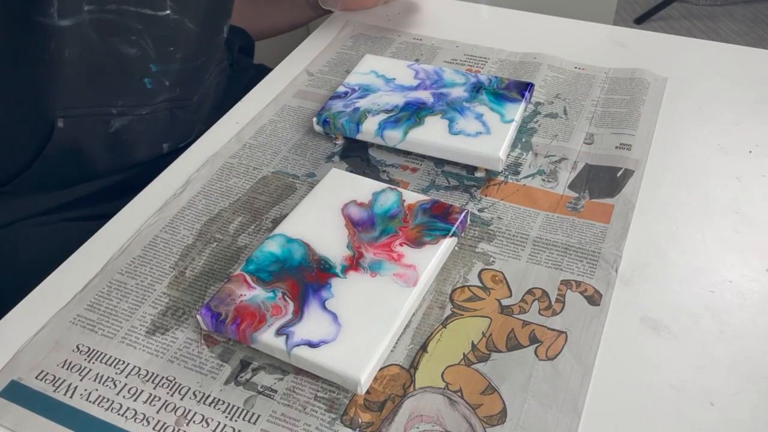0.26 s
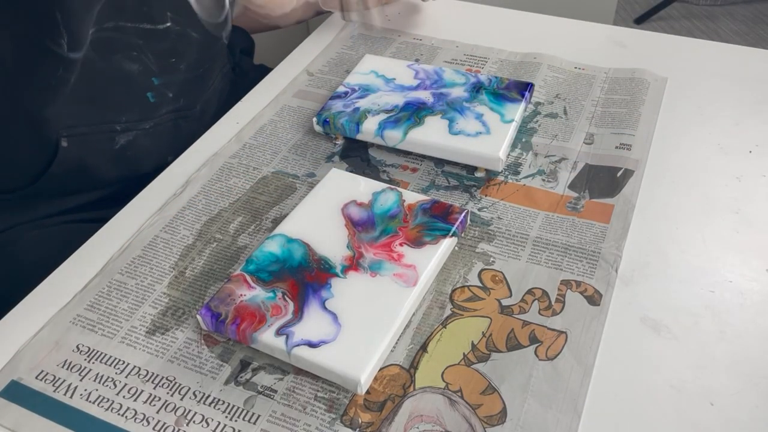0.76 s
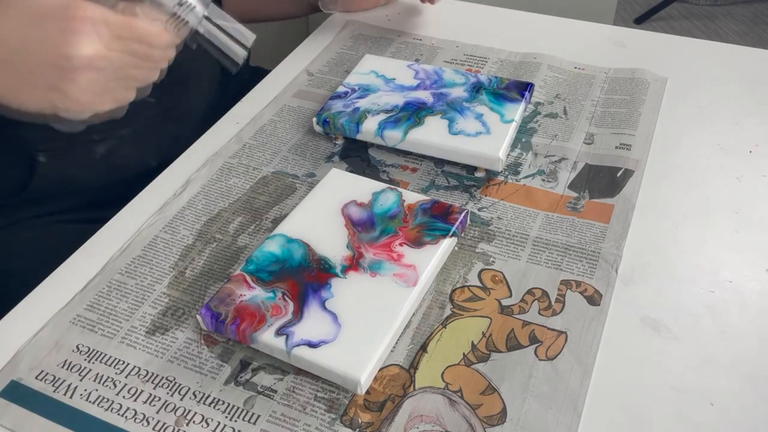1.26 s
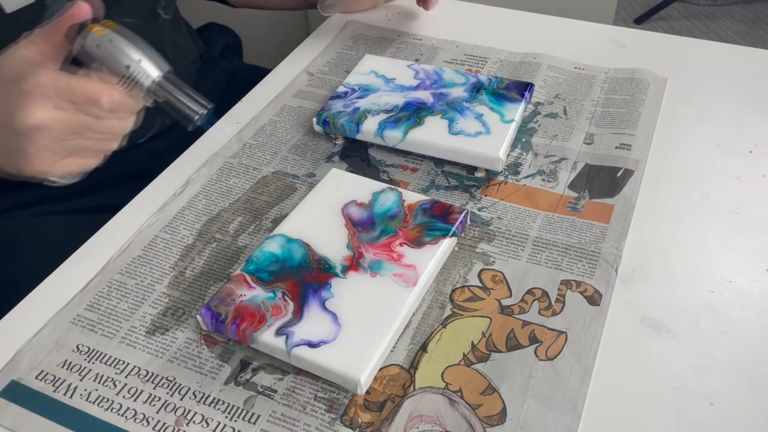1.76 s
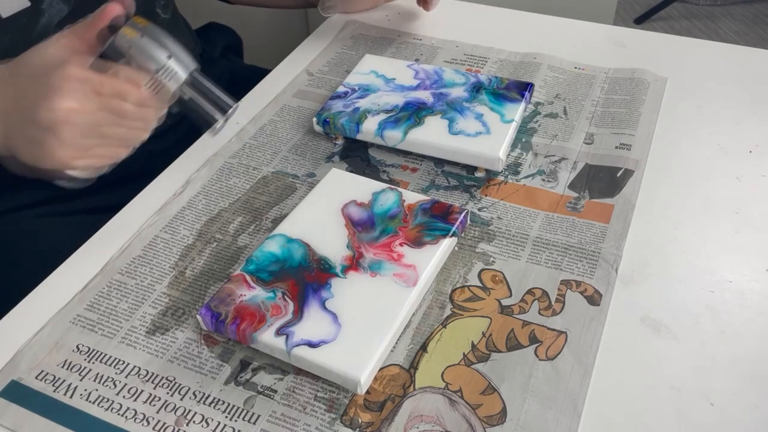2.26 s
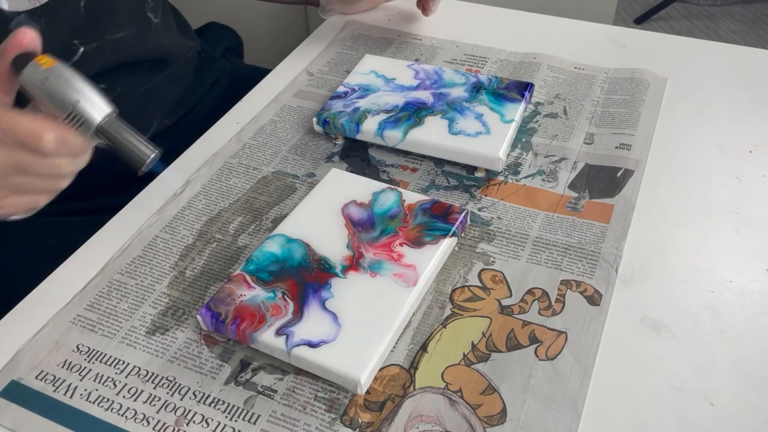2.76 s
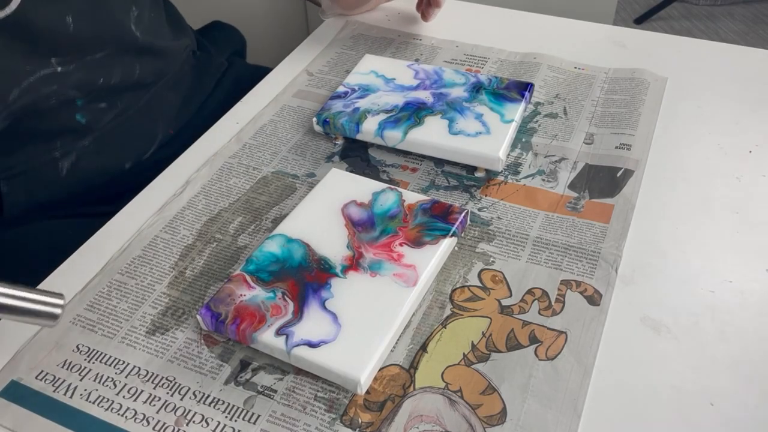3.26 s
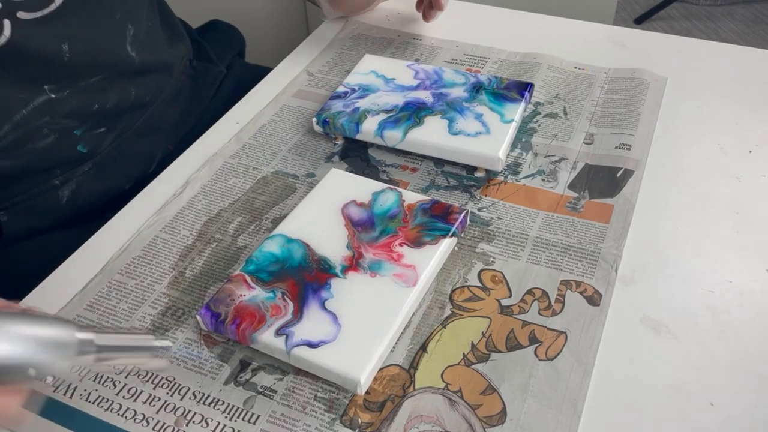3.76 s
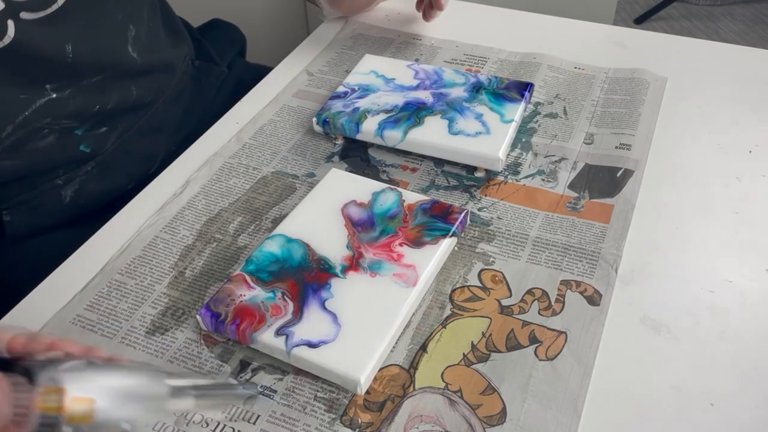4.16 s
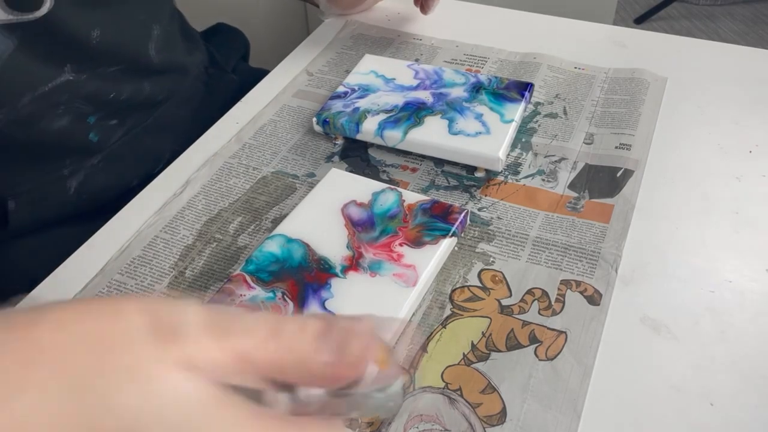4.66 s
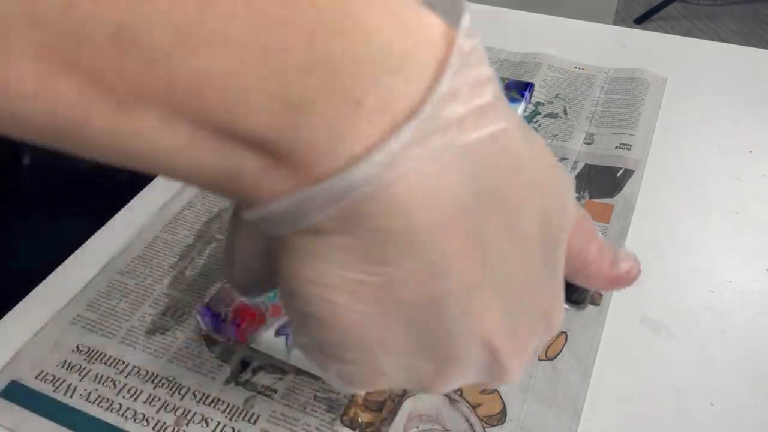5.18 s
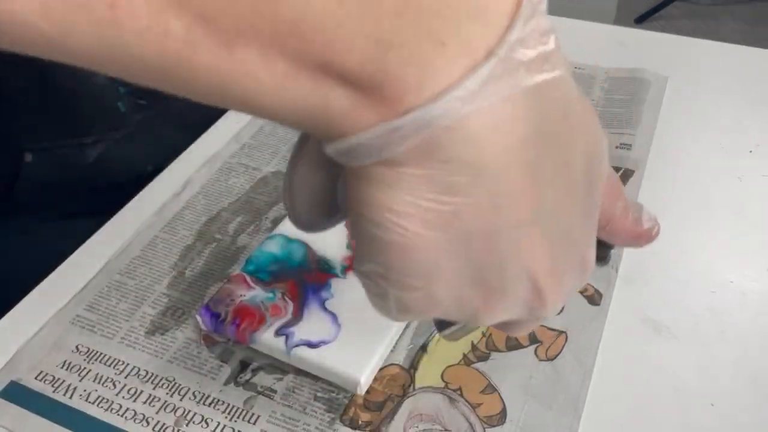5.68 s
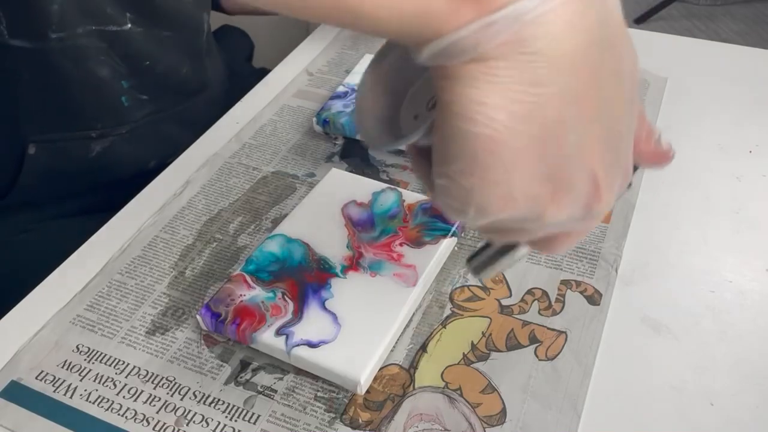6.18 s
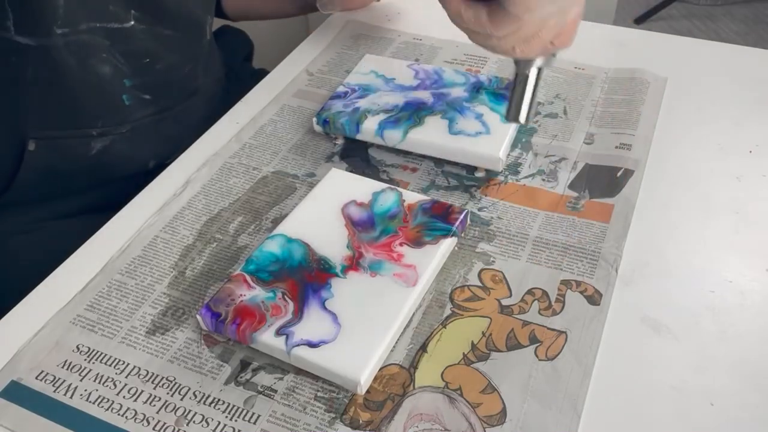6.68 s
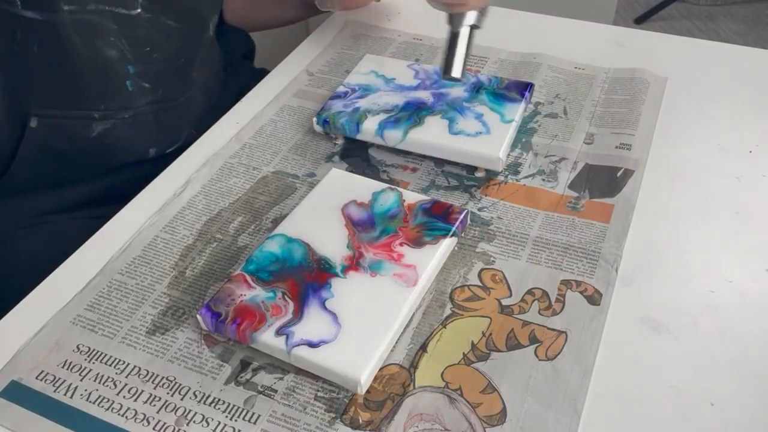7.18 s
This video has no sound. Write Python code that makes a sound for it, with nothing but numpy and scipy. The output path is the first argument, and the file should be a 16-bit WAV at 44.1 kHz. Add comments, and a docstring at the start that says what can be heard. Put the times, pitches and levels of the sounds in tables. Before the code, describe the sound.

Steady blowtorch hiss in a room, repeatedly released and relit: light clicks, brief cold gas hiss, loud crisp spark snap, low whoomp, renewed roar.

```python
"""Butane torch over wet paintings

A small torch, already alight, is swept over wet paintings on a workroom table and relit four times.
Each relight: safety catch clicks, cold gas hisses, the piezo hammer snaps, the mixture thumps alight.
Shaped noise makes the flame's roar and hiss, resonated noise bursts the contacts; the room echoes and hums."""
import sys
import numpy as np
from scipy import signal
from scipy.fft import rfft, irfft, next_fast_len
from scipy.io import wavfile
from scipy.ndimage import uniform_filter1d, map_coordinates

SR = 44100
rng = np.random.default_rng(int(sys.argv[2]) if len(sys.argv) > 2 else 0)


def unload_audio(sound):
    """Save the sound as a 16-bit wav file, at the path given as the first command line argument."""
    columns = np.transpose(np.atleast_2d(sound))
    # keep every value between -1 and 1, then stretch to whole-number steps
    steps = np.round(np.clip(columns, -1, 1) * 32767)
    wavfile.write(sys.argv[1], SR, steps.astype(np.int16))


N = 327663

# One row per squeeze of the trigger, the first already alight; the hold colours each flame. Relative levels:
# (gas opens [s], cold gas [dB], roar [dB], jet hiss [dB], favoured pitch [Hz], its boost [dB],
#  body [dB], presence [dB], treble [dB])
BURNS = [(-.4, -55, -46, -56, 1290, 6, -2, 1, -.5), (1.43, -56.5, -45, -54.5, 632, 4, -2, -1, 0),
         (3.268, -55, -44, -55.5, 738, 1.5, -1.5, .5, 0),
         (4.854, -57, -43.5, -53.5, 1590, 4.5, 2.5, -0.9, -4),
         (6.853, -55.5, -45.8, -55.5, 1095, 7, 6, 3, -1.5)]
# Piezo snaps, each with its ignition thump:
# (time [s], snap level [dB], thump level [dB], snap rise [s], lower ring [Hz], upper ring [Hz])
SNAPS = [(1.5291, -15.5, -27, 0.0013, 2830, 8560), (3.3257, -14.5, -27, 0.00042, 7600, 14400),
         (5.0003, -14.5, -26.5, 0.00058, 1550, 11200), (6.9117, -14.5, -25, 0.00078, 6000, 12800)]
# Letting go: the valve ticks shut, then the trigger meets its stop:
# (time [s], valve level [dB], stop level [dB], trigger travel [s], stop's ring [Hz])
RELEASES = [(0.908, -44.5, -43, 0.018, 2660), (2.848, -46, -48, .025, 2720), (4.381, -43, -54, 0.024, 1997),
            (6.537, -43.5, -42, .025, 1780)]
# Low resonances of table and room: (frequency [Hz], width [Hz], relative level [dB])
ROOM_MODES = [(139, 19, 6), (217.5, 38, 4.5), (323, 8.6, 0.5), (510, 20, -3.5), (620, 47, -7)]
DRIFT_PER_S = 4.5  # random knots a second in the unsteady hand


def amp(db):
    """Decibels to gain."""
    return 10 ** (np.asarray(db) / 20)


def unit(x):
    """Scale to rms 1."""
    return x / np.sqrt(np.mean(x ** 2) + 1e-20)


def along(points, hz):
    """Read (Hz, value) points on a log frequency axis."""
    f, v = np.transpose(points)
    return np.interp(np.log(hz + 1), np.log(f + 1), v)


def wobble(rate):
    """A smooth random curve through rate knots a second."""
    knots = rng.standard_normal(int(N * rate / SR) + 4)
    return map_coordinates(knots, [np.arange(N) * rate / SR])


def gate(start, stop, rise, fall):
    """An envelope that swells from start and dies away from stop, both exponentially."""
    t = np.arange(N) / SR
    swell = 1 - np.exp(-np.maximum(t - start, 0) / rise)
    return swell * np.exp(-np.maximum(t - stop, 0) / fall)


def filtered(x, response):
    """Filter x by a response given as a function of frequency."""
    m = next_fast_len(len(x) + SR // 8)
    return irfft(rfft(x, m) * response(np.fft.rfftfreq(m, 1 / SR)), m)[:len(x)]


def resonate(x, modes):
    """x plus the ringing of its (Hz, width Hz, dB) band-pass resonances."""
    def response(f):
        ringing = sum(amp(db) * 1j * f * width / (hz * hz - f * f + 1j * f * width)
                      for hz, width, db in modes)
        return 1 + ringing
    return filtered(x, response)


def noise(spectrum, size=N):
    """Random noise coloured by a spectrum and scaled to rms 1."""
    return unit(filtered(rng.standard_normal(size), lambda hz: amp(along(spectrum, hz))))


def smooth_patches(shape, bins, frames):
    """Random time-frequency patches of rms 1, smoothed over bins and frames."""
    grain = uniform_filter1d(rng.standard_normal(shape), size=bins, axis=0)
    return unit(uniform_filter1d(grain, size=frames, axis=1))


def add(track, s, sound):
    """Mix a sound in at time s."""
    part = track[round(s * SR):][:len(sound)]
    part += sound[:len(part)]


def burn_times():
    """(gas opens, flame lights, valve closes) per burn: snaps light it, releases end it; the last burns on."""
    opens = [s for s, *_ in BURNS]
    lit = opens[:1] + [s for s, *_ in SNAPS]
    shut = [s for s, *_ in RELEASES] + [N / SR + .5]
    return zip(opens, lit, shut)


def workroom(rush_db=-65.5):
    """The room's faint rush is shaped noise; its hum is one sine of wavering phase."""
    # Rush spectrum: (frequency [Hz], relative density [dB])
    rush_spectrum = [(20, -9.5), (45, -1.5), (65, -7), (100, -5.5), (200, -6), (600, -19), (1200, -17),
                     (2200, -18), (3600, -22), (6400, -26), (16000, -34)]
    # Hum: (frequency [Hz], level [dB])
    hum_hz, hum_db = (210, -78.5)
    hum = np.sin(2 * np.pi * hum_hz * np.arange(N) / SR + .6 * wobble(3.3))
    return amp(rush_db) * noise(rush_spectrum) + amp(hum_db) * unit(hum)


def room_tail(build=0.0018):
    """The room's impulse response, of unit energy: noise whose every frequency dies at its own speed."""
    # Decay of the room: (frequency [Hz], t60 [s])
    decay_times = [(120, 0.27), (500, 0.42), (2000, 0.49), (7000, 0.41), (11000, 0.37), (15000, 0.44)]
    hz, t, z = signal.stft(rng.standard_normal(SR // 2), SR, nperseg=256)
    decay = amp(-60 * t / along(decay_times, hz)[:, None])
    tail = signal.istft(z * decay, SR, nperseg=256)[1][:SR // 2]
    # the echoes take a moment (build, s) to gather
    tail = tail * (1 - np.exp(-(np.arange(len(tail)) / SR / build) ** 2))
    return tail / np.linalg.norm(tail)


def reverb(x):
    """x as the room returns it, through one fresh set of echoes."""
    return signal.fftconvolve(x, room_tail())[:len(x)]


def moving_reverb(x, count=16):
    """The torch moves, so each stretch of its sound meets a different set of echoes."""
    wet = np.zeros(N)
    for part in np.array_split(np.arange(N), count):
        stretch = np.pad(x[part], (0, SR // 2))  # leaves room for the tail
        add(wet, part[0] / SR, reverb(stretch))
    return wet


def tank():
    """The gas tank, knocked, rings on with two faint decaying sines."""
    # Knocks: (time [s], ring level before each note's own [dB])
    knocks = [(0.927, -64), (4.592, -59), (6.684, -59.5)]
    # The tank's notes: (frequency [Hz], relative level [dB], t60 [s])
    notes = [(1240, 1, 0.44), (2000, 1, .36)]
    track, t = np.zeros(N), np.arange(SR // 2) / SR
    ring = sum(amp(db - 60 * t / t60) * np.sin(2 * np.pi * hz * t) for hz, db, t60 in notes)
    for s, db in knocks:
        add(track, s, amp(db) * ring)
    return track


def blow(rings, rise, t60, rattle_db, rattle_t60, metal_db, room_db):
    """A contact in the torch: crack and rattle through the housing, ringing thin metal, the room's wash."""
    # Crack of the contact: (frequency [Hz], relative density [dB])
    crack_spectrum = [(200, -13), (900, -5.5), (1600, -6), (3000, 1.5), (5200, -1.5), (6500, 0.5),
                      (9000, 2), (12000, -2.5), (14300, -3), (16000, -9.5)]
    # The torch's damped housing: (frequency [Hz], width [Hz], relative level [dB])
    housing_modes = [(1610, 270, 8), (1980, 180, 3), (4670, 300, -3), (6350, 1100, -1), (8730, 970, 2),
                     (12900, 1100, -10.5), (14050, 800, 8.5)]
    # Metal tube and spring, levels varied at random: (frequency [Hz], relative level [dB], t60 [s])
    metal_notes = [(2225, -26, 0.53), (6270, -21, 0.17), (6650, -14, 0.044), (6800, -26.5, 0.18),
                   (7100, -31, 0.16), (8900, -25.5, .1)]
    # What a contact radiates over all directions: (frequency [Hz], relative density [dB])
    radiated_spectrum = [(300, -0.5), (1250, -5.5), (2100, 2), (3400, -7), (4700, -1.5), (5700, -3.5),
                         (6800, 5), (7900, -4), (8900, 2), (10300, -7.5), (12200, -7), (13000, -5.5),
                         (14400, -8.5), (15800, -20)]
    t = np.arange(SR // 2) / SR
    swell = 1 - np.exp(-(t / rise) ** 2)
    decay = amp(-60 * t / t60) + amp(rattle_db - 60 * t / rattle_t60)
    force = swell * decay * noise(crack_spectrum, size=len(t))
    hit = resonate(resonate(force, housing_modes), rings)
    # the loudest 128-sample stretch gets rms 1
    hit = hit / np.sqrt(uniform_filter1d(hit ** 2, size=128).max())
    metal = np.zeros(len(t))
    for hz, db, life in metal_notes:
        ring_level = amp(db + rng.normal(0, 1.8) - 60 * t / life)
        metal += ring_level * np.sin(2 * np.pi * (hz * t + rng.random()))
    # the walls gather every direction, so the wash is smoother in colour than the direct crack
    wash = swell * filtered(room_tail(), lambda hz: amp(along(radiated_spectrum, hz)))
    wash = resonate(wash, [(hz, width, db - 9.5) for hz, width, db in rings])
    wash = wash * np.linalg.norm(hit) / np.linalg.norm(wash)
    return hit + amp(metal_db) * swell * metal + amp(room_db) * wash


def click(rise, tilt_db, ring_hz, ring_db=8, ring_width_hz=380, dull_hz=11000):
    """A light contact in the torch's handle; its treble tilts by tilt_db an octave and is dulled on top."""
    sound = blow([(ring_hz, ring_width_hz, ring_db)], rise, t60=0.019,
                 rattle_db=-15.0, rattle_t60=0.11, metal_db=-13, room_db=-5)

    def tilt(hz):
        octaves = np.log2(np.maximum(hz, 1500) / 5000)  # the tilt pivots at 5 kHz, flat below 1.5 kHz
        return amp(tilt_db * octaves) / np.sqrt(1 + (hz / dull_hz) ** 6)
    return filtered(sound, tilt)


def grip(waver_hz=45, stutter_db=3):
    """Fingers scuff the handle before each spark, as soft clicks; one squeak is a wavering, stuttering sine."""
    # Fingers shifting on the grip: (time [s], level before the treble tilt [dB])
    shifts = [(1.251, -65.5), (1.35, -64), (3.045, -64.5), (3.238, -61), (4.786, -62.5), (4.95, -58.5),
              (6.812, -58), (6.893, -61)]
    # Their soft scuff: (rise [s], treble tilt [dB per octave], ring [Hz])
    scuff = (0.012, -1.7, 2200)
    # Squeak as the grip tightens: (start [s], end [s], mean pitch [Hz], mean level [dB])
    start, end, hz, squeak_db = (1.11, 1.22, 5850, -75)
    tone = np.sin(2 * np.pi * np.cumsum(hz + waver_hz * wobble(120)) / SR)
    stutter = amp(squeak_db + stutter_db * wobble(40))
    track = stutter * gate(start, end, rise=0.027, fall=.05) * tone
    for s, db in shifts:
        add(track, s, amp(db) * click(*scuff))
    return track


def catches(rise=0.00055):
    """Between burns the safety catch clicks over, and each click rebounds once, duller."""
    # Clicks, levels before the tilt:
    # (time [s], level [dB], treble tilt [dB per octave], ring [Hz], rebound relative to click [dB])
    catch_clicks = [(1.317, -49.5, -5, 3200, 0), (1.405, -34, 0, 5540, -16.5), (3.067, -46, -3, 8800, -1.5),
                    (3.122, -42.5, -1.5, 2050, -1), (4.589, -44, -3.5, 3620, -7.5),
                    (6.681, -43, -3, 4600, -4)]
    # The rebound: (delay [s], added tilt [dB per octave], ring [Hz])
    delay, duller_db, rebound_hz = (.006, -1.3, 2650)
    track = np.zeros(N)
    for s, db, tilt_db, ring_hz, rebound_db in catch_clicks:
        add(track, s, amp(db) * click(rise, tilt_db, ring_hz))
        rebound = click(rise, tilt_db + duller_db, rebound_hz)
        add(track, s + delay, amp(db + rebound_db) * rebound)
    return track


def releases():
    """A burn ends with the valve's tick and the trigger springing back against its stop."""
    # The valve's tick: (rise [s], treble tilt [dB per octave], ring [Hz])
    valve_tick = (.0015, -6.5, 7800)
    # The trigger's stop: (rise [s], treble tilt [dB per octave])
    trigger_stop = (.001, -6.5)
    track = np.zeros(N)
    for s, valve_db, stop_db, travel, ring_hz in RELEASES:
        add(track, s, amp(valve_db) * click(*valve_tick))
        add(track, s + travel, amp(stop_db) * click(*trigger_stop, ring_hz))
    return track


def cold_gas(whistle_db=-4, pressure_rise=0.1):
    """Unlit gas hisses from valve opening to spark, and whistles as the pressure builds."""
    # Hiss of the gas: (frequency [Hz], relative density [dB])
    hiss_spectrum = [(900, -27), (1750, -20.5), (2400, -30), (3400, -21), (4100, 3.5), (5500, -5),
                     (6900, -0.5), (8000, 0), (9400, 5), (10300, -10), (11600, -13), (13200, -8.5),
                     (15000, -19.5)]
    # Whistling bands: (frequency [Hz], relative density [dB])
    whistle_spectrum = [(8000, -36.5), (9350, -2), (10300, -22.5), (12000, -26.5), (13200, -6),
                        (14500, -23)]
    flow, pressure = np.zeros(N), np.zeros(N)
    for (opens, lit, _), (_, db, *_) in zip(burn_times(), BURNS):
        flow += amp(db) * gate(opens, lit, rise=.018, fall=.01)
        pressure += amp(db) * gate(opens, lit, rise=pressure_rise, fall=.01) ** 2
    whistle = amp(whistle_db) * pressure * noise(whistle_spectrum)
    return flow * noise(hiss_spectrum) + whistle


def thump(ring_hz=195, swell=0.002, lag=0.00093):
    """The gas in the tube lights all at once: a few low cycles that swell and die."""
    t = np.maximum(np.arange(SR // 2) / SR - lag, 0)
    push = (t / swell) ** 2 * np.exp(-t / swell)
    return -push / push.max() * np.sin(2 * np.pi * ring_hz * t)


def ignitions(thump_room_db=-8, thump_ring_db=-6, ring_db=1, ring_width_hz=700):
    """The piezo hammer snaps and its spark lights the gas, whose thump wakes the table and the room."""
    track = np.zeros(N)
    thump_modes = [(hz, width, db + thump_ring_db) for hz, width, db in ROOM_MODES]
    for s, snap_db, thump_db, rise, *ring_hz in SNAPS:
        rings = [(hz, ring_width_hz, ring_db) for hz in ring_hz]
        snap = blow(rings, rise, t60=0.0135, rattle_db=-15, rattle_t60=0.074, metal_db=-2.5, room_db=-5.3)
        pop = amp(thump_db) * thump()
        boom = resonate(pop, thump_modes)
        add(track, s, amp(snap_db) * snap + boom + amp(thump_room_db) * reverb(pop))
    return track


def aimed(x, octaves=0.12, wander_octaves=.08, body_hz=380, presence_hz=2900, treble_hz=9500,
          bass_hz=230, patchy_db=1.7, ripple_db=1.6, ripple_hz=900):
    """Aim colours each burn and wanders with the hand; near reflections ripple it, fine random patches roughen it."""
    hz, t, z = signal.stft(x, SR, nperseg=1024)
    opens, *_, favoured_hz, boost_db, body_db, presence_db, treble_db = np.transpose(BURNS)
    burn = np.searchsorted(opens, t) - 1  # which burn each frame belongs to
    wander = np.interp(t, np.arange(N) / SR, wobble(DRIFT_PER_S))
    centre = favoured_hz[burn] * 2 ** (wander_octaves * wander)
    f = hz[:, None] + 1

    def bump(at, width):
        return np.exp(-.5 * (np.log2(f / at) / width) ** 2)  # width in octaves

    def above(edge):
        return 1 / (1 + (edge / f) ** 6)

    patches = smooth_patches(z.shape, bins=4, frames=4)
    ripple = smooth_patches(z.shape, bins=3, frames=30)  # lasts longer than the patches
    colour_db = (boost_db[burn] * bump(centre, octaves) + body_db[burn] * bump(body_hz, 0.11)
                 + presence_db[burn] * bump(presence_hz, 0.29) + treble_db[burn] * above(treble_hz))
    chance_db = patchy_db * above(bass_hz) * patches + ripple_db * above(ripple_hz) * ripple
    return signal.istft(z * amp(colour_db + chance_db), SR, nperseg=1024)[1][:N]


def flame(roar_db=-0.1, jet_db=-0.35, flutter_db=-0.25, jet_flutter_db=.9):
    """Turbulent burning roars low through table and room; the hot jet hisses through the burner tube."""
    # Roar of the burning: (frequency [Hz], relative density [dB])
    roar_spectrum = [(40, -51), (90, -29), (125, -16), (175, -8), (230, -5.5), (380, -2), (480, 2.55),
                     (650, -2.5), (850, -1), (1100, -6), (1400, -9.5), (1800, -14), (2400, -21),
                     (5000, -38)]
    # Hiss of the jet: (frequency [Hz], relative density [dB])
    jet_spectrum = [(900, -25), (2200, 8), (3100, 6.5), (3800, 5.5), (4700, 3), (5500, 2), (7000, -5.5),
                    (7700, -2.5), (8700, 1), (10200, -6), (11800, 0), (12700, -2), (13900, -3.5),
                    (15500, -22.5)]
    # Resonances of the burner tube: (frequency [Hz], width [Hz], relative level [dB])
    nozzle_modes = [(4555, 320, 0), (8670, 1180, 6.5), (13800, 1100, -4.5)]
    # Brief flares, at half these decibels in the jet: (time [s], length [s], roar's rise [dB])
    flares = [(0.005, 0.045, 4.5), (0.451, 0.041, 3.5), (2.448, 0.24, 0.6), (3.866, 0.099, 0.6),
              (5.83, 0.082, 2.3)]
    surge_db, settle_s = 1, 0.44  # a fresh jet overshoots, then settles
    sweep_db, drift_db = -0.1, 0.05  # the roar eases a trace mid-sweep; an unsteady hand makes it drift
    starve_s = 0.014  # the roar starves this long before the valve is fully shut
    t = np.arange(N) / SR
    burning, flowing = np.zeros(N), np.zeros(N)
    for (_, lit, shut), (_, _, burn_roar_db, burn_jet_db, *_) in zip(burn_times(), BURNS):
        sweep = np.sin(np.pi * np.clip((t - lit) / (shut - lit), 0, 1)) - 2 / np.pi  # averages to zero
        surge = np.exp(-np.maximum(t - lit, 0) / settle_s)
        burning += amp(burn_roar_db + sweep_db * sweep) * gate(lit, shut - starve_s, rise=0.026, fall=0.0041)
        flowing += amp(burn_jet_db + surge_db * surge) * gate(lit, shut, rise=.01, fall=.021)
    flare = sum(db * gate(s, s + length, rise=0.0036, fall=0.015) for s, length, db in flares)
    drift = drift_db * wobble(DRIFT_PER_S)
    roar_level = amp(roar_db + drift + flare + flutter_db * wobble(60))
    jet_level = amp(jet_db + drift + .5 * flare + jet_flutter_db * wobble(150))
    roar = roar_level * unit(resonate(noise(roar_spectrum), ROOM_MODES))
    jet = jet_level * unit(resonate(noise(jet_spectrum), nozzle_modes))
    return aimed(burning * roar + flowing * jet)


def scene(room_db=-3):
    """The torch, its handling and its echoes over the workroom's own sound."""
    gas = flame() + cold_gas()
    handling = releases() + catches() + grip() + tank()
    echoes = amp(room_db) * moving_reverb(gas)
    return (gas + echoes + ignitions() + handling + workroom())[None]


def record(dry, top_hz=16000):
    """The microphone's band limit: a very steep low-pass at top_hz."""
    return np.array([filtered(channel, lambda hz: 1 / (1 + (hz / top_hz) ** 120)) for channel in dry])


dry = scene()
out = record(dry)
unload_audio(out)
```